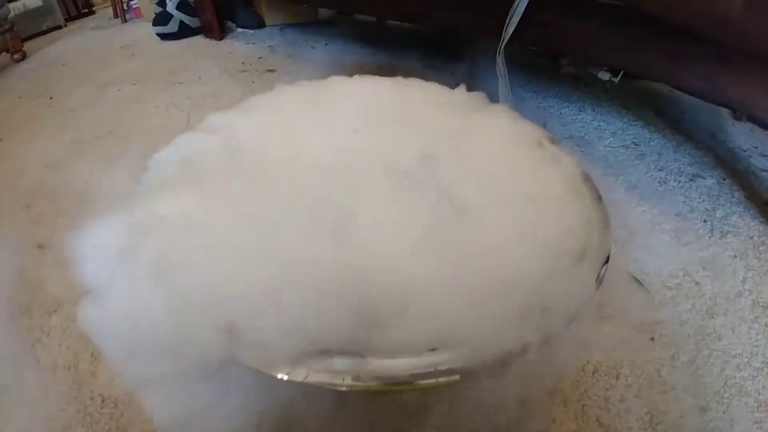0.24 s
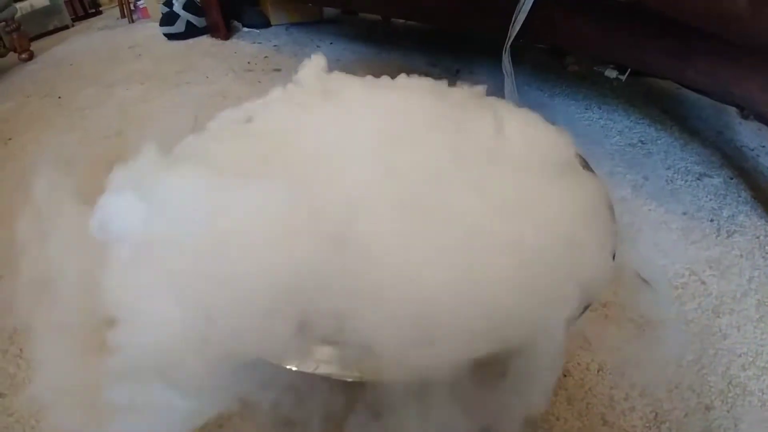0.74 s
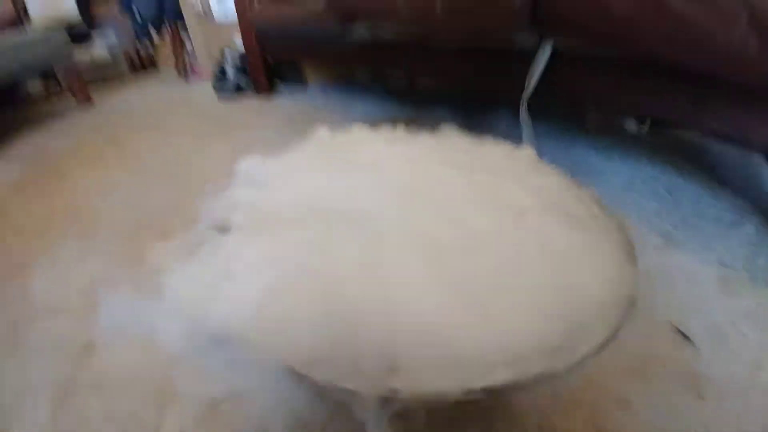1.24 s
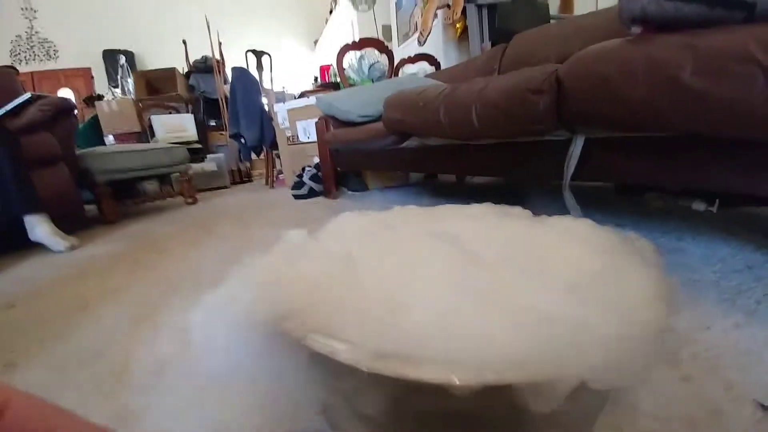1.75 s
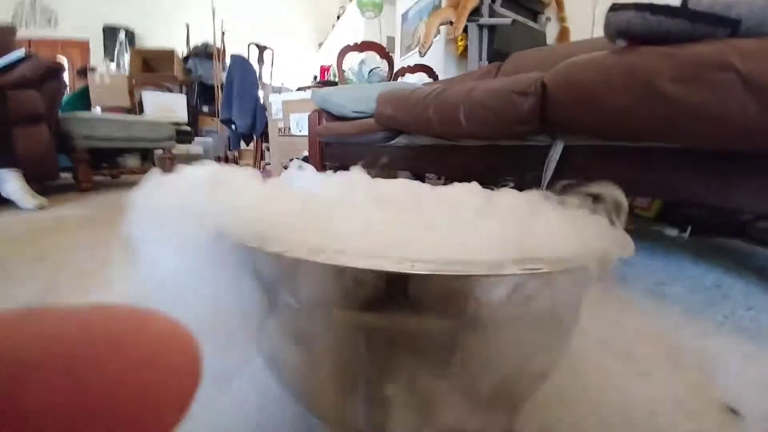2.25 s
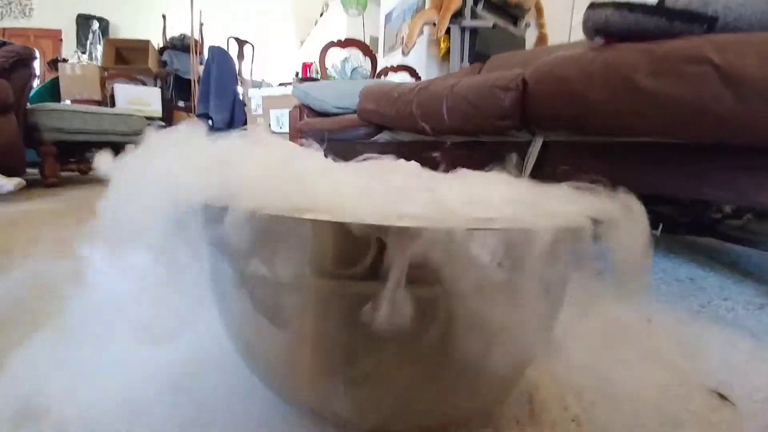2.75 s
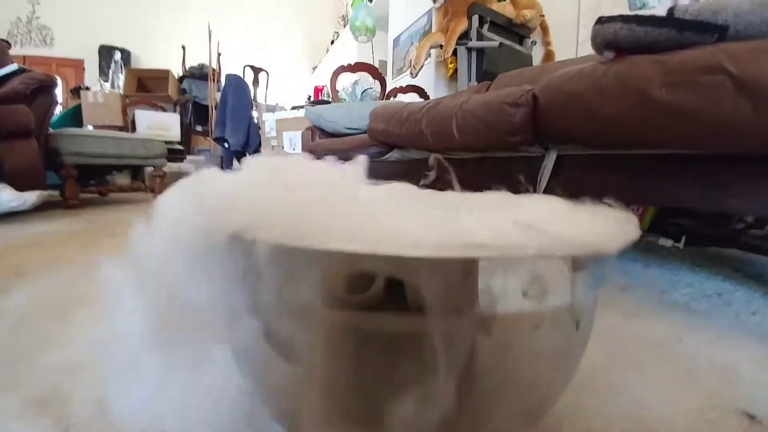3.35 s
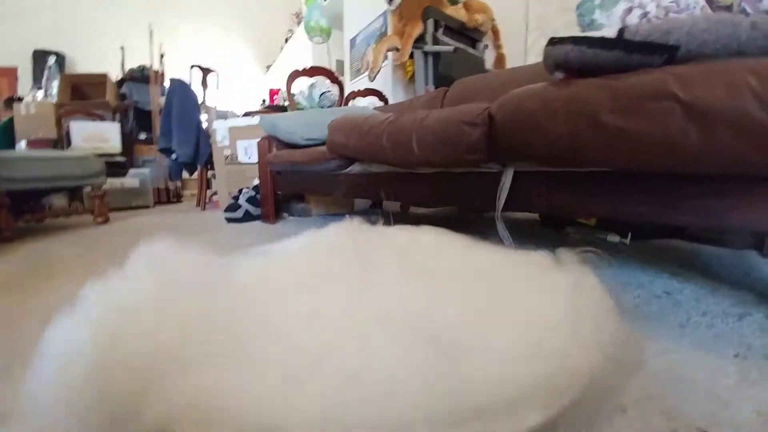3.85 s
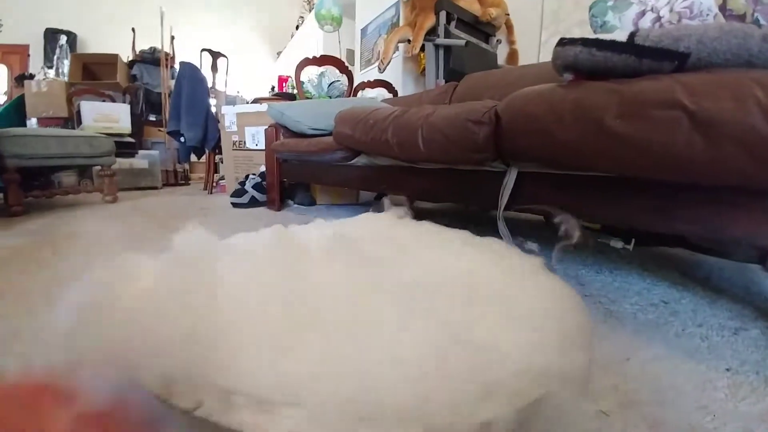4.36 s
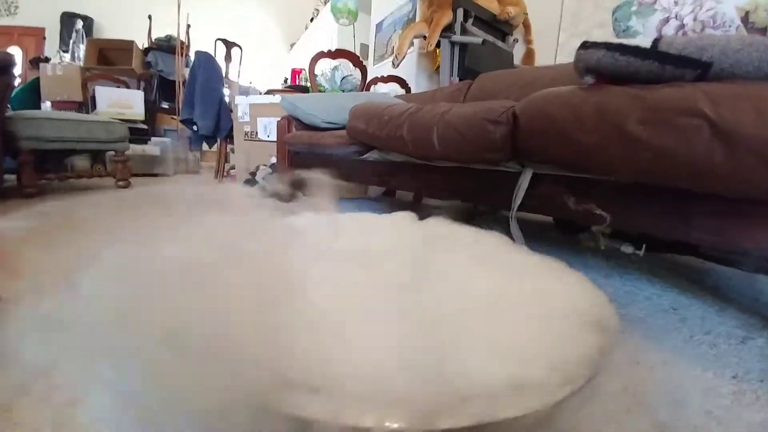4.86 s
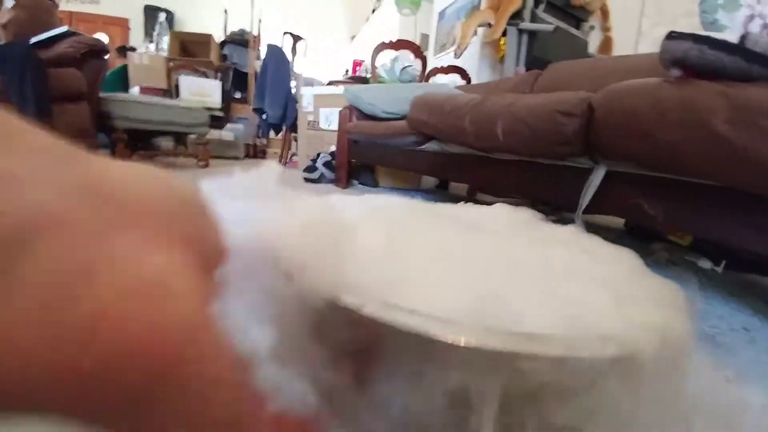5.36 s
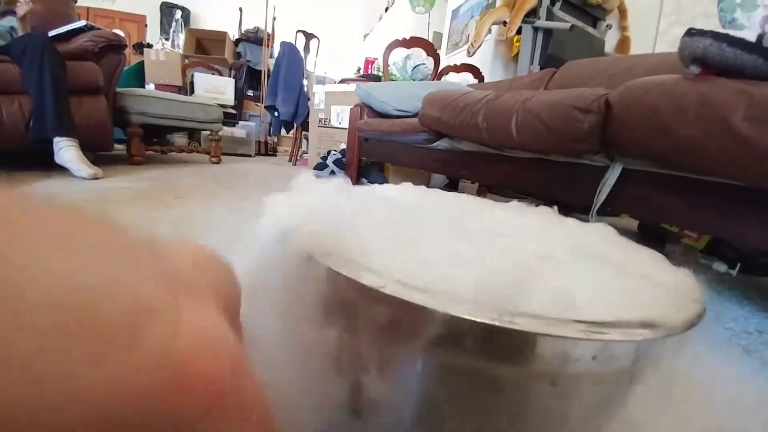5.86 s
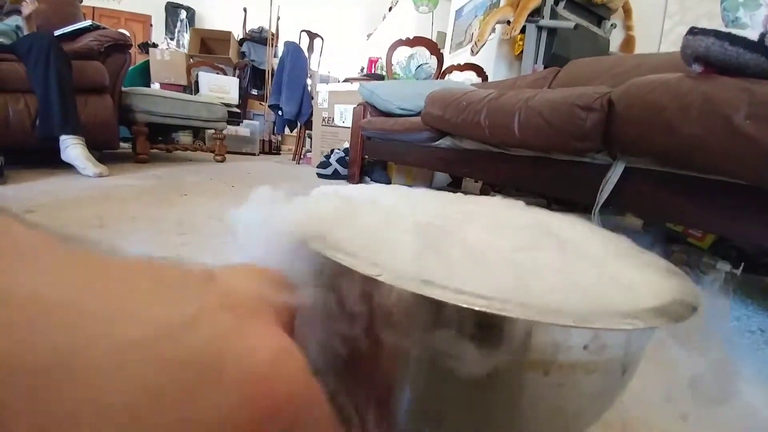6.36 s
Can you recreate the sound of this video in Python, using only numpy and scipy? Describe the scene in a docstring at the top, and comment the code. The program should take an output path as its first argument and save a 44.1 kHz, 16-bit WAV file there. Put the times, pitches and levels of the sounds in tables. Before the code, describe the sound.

Dry ice boils noisily in a steel bowl, hollow gurgles and blips tumbling over one another amid light crackling spray and low hum.

```python
"""Dry ice boils in a steel bowl of water on a living-room carpet, heard from close by over appliance hum and air.
It opens on the loudest glug: a sine swells as its pitch glides up through the bowl's resonances. More follow
to the end, over a churn of small ringing bubbles, a hissing, crackling spray and faint chirps.
From 0.18 s falling drops plink, as a ringing bubble with a volley of droplet ticks.
From 0.37 s the sharpest films snap, as noise cracks with a short ring, among fainter snaps at random times."""
import sys
import numpy as np
from scipy import signal
from scipy.fft import rfft, irfft, next_fast_len
from scipy.io import wavfile
from scipy.ndimage import uniform_filter1d

SR = 44100
rng = np.random.default_rng(int(sys.argv[2]) if len(sys.argv) > 2 else 0)


def digitize_waveform(pressure):
    """Quantize a signal to 16-bit integers and store it at the path in sys.argv[1].

    Rows of a 2-D input are taken as channels; values are limited to [-1, 1].
    """
    field = np.atleast_2d(pressure).T
    bounded = np.clip(field, -1, 1)
    quanta = np.round(bounded * 32767).astype(np.int16)
    wavfile.write(sys.argv[1], SR, quanta)


N = 291677
TIME = np.arange(N) / SR

# appliance hum, one motor tone a row, before drift and waver: f/Hz, level/dB
HUM = [(58.6, -43), (67.1, -51), (84, -57.5), (109.2, -46), (120, -51), (176, -55.5), (219.7, -54)]
# spectral shape of the moving air in the room: f/Hz, relative level/dB
AIR = [(20, -31), (45, -11), (60, 5.5), (115, 1.5), (200, 2.5), (320, -4.5), (700, -1), (2000, -37),
       (8000, -48), (16000, -86)]
# loudest big bubbles, before the bowl's colour and the layer's trim:
# t/s (top of the swell), f/Hz, peak level/dB, swell/s, climb/(octaves/s)
GLUGS = [(0.005, 570, -1.4, 0.0095, 17), (0.024, 800, -16.0, 0.008, 15), (0.116, 560, -11.5, 0.008, 12),
         (0.135, 560, -12.0, 0.006, 12), (0.167, 680, -15.0, 0.004, 55), (0.184, 500, -14.0, 0.012, 13),
         (0.23, 560, -17.0, 0.014, 33), (0.271, 520, -18.5, 0.008, 8), (0.295, 570, -13.0, 0.005, 11),
         (0.295, 1340, -6.5, 0.002, 15), (0.375, 520, -12.0, 0.012, 12), (0.398, 710, -5.5, 0.002, 27),
         (0.421, 1330, -7.5, 0.002, 55), (0.46, 620, -16.5, 0.006, 15), (0.494, 550, -17.5, 0.008, 50),
         (0.512, 570, -14.0, 0.006, 37), (0.6, 510, -12.5, 0.006, 0), (0.633, 510, -15.0, 0.014, 15),
         (0.651, 550, -14.5, 0.006, 0), (0.672, 1080, -13.0, 0.009, 18), (0.676, 650, -10.0, 0.003, 60),
         (0.685, 600, -7.0, 0.0025, 36), (0.692, 500, -9.5, 0.01, 18), (0.731, 550, -11.5, 0.005, 12),
         (0.831, 560, -18.5, 0.007, 29), (0.899, 560, -12.5, 0.01, 16), (0.913, 790, -17.0, 0.016, 27),
         (0.935, 1250, -14.0, 0.005, 15), (0.949, 500, -16.5, 0.011, 16), (1.041, 550, -6.0, 0.007, 18),
         (1.186, 520, -11.5, 0.011, 21), (1.295, 1200, -16.0, 0.006, 25), (1.328, 640, -20.5, 0.02, 24),
         (1.357, 860, -18.5, 0.015, 34), (1.431, 540, -16.5, 0.009, 19), (1.517, 570, -16.5, 0.003, 4),
         (1.604, 580, -13.0, 0.004, 33), (1.642, 590, -14.0, 0.009, 20), (1.717, 520, -15.5, 0.012, 15),
         (1.742, 900, -19.0, 0.02, 26), (1.812, 540, -16.5, 0.011, 19), (1.921, 610, -15.0, 0.009, 6),
         (1.957, 590, -10.0, 0.003, 20), (2.093, 640, -14.5, 0.007, 15), (2.132, 570, -16.5, 0.007, 25),
         (2.186, 590, -18.0, 0.02, 28), (2.204, 800, -8.5, 0.002, 12), (2.247, 620, -12.5, 0.007, 26),
         (2.279, 860, -9.5, 0.002, 0), (2.322, 680, -19.0, 0.02, 36), (2.577, 550, -20.5, 0.02, 15),
         (2.619, 870, -11.5, 0.002, 60), (2.838, 840, -15.5, 0.004, 2), (2.846, 410, -12.0, 0.008, 22),
         (2.856, 570, -16.5, 0.009, 13), (2.979, 900, -12.0, 0.003, 45), (3.013, 490, -16.5, 0.009, 14),
         (3.073, 1180, -15.0, 0.004, 30), (3.076, 540, -12.5, 0.005, 10), (3.133, 420, -14.0, 0.008, 20),
         (3.154, 590, -15.5, 0.017, 14), (3.376, 1280, -11.5, 0.005, 35), (3.415, 810, -15.5, 0.007, 2),
         (3.463, 570, -17.5, 0.01, 30), (3.464, 1180, -16.0, 0.004, 30), (3.514, 560, -18.0, 0.007, 3),
         (3.52, 940, -20.0, 0.02, 13), (3.645, 580, -16.5, 0.005, 3), (3.818, 850, -14.5, 0.003, 5),
         (3.831, 590, -11.5, 0.004, 29), (3.969, 540, -18.0, 0.005, 17), (3.99, 840, -11.5, 0.013, 23),
         (4.008, 1160, -15.0, 0.009, 45), (4.082, 510, -16.0, 0.008, 27), (4.23, 560, -18.0, 0.01, 23),
         (4.268, 870, -14.5, 0.006, 12), (4.295, 690, -19.5, 0.02, 24), (4.412, 580, -3.5, 0.003, 2),
         (4.421, 840, -11.0, 0.003, 45), (4.556, 570, -15.5, 0.005, 0), (4.601, 620, -17.0, 0.009, 39),
         (4.67, 540, -18.5, 0.006, 13), (4.927, 560, -10.5, 0.006, 23), (5.007, 530, -20.0, 0.012, 11),
         (5.038, 600, -16.5, 0.02, 27), (5.067, 1250, -12.5, 0.006, 25), (5.288, 840, -9.0, 0.004, 47),
         (5.336, 550, -12.5, 0.006, 2), (5.484, 570, -7.0, 0.008, 25), (5.503, 780, -13.5, 0.007, 18),
         (5.533, 570, -17.0, 0.007, 3), (5.699, 830, -10.5, 0.002, 0), (5.766, 620, -11.5, 0.003, 0),
         (5.949, 520, -11.5, 0.008, 27), (5.964, 510, -16.0, 0.009, 12), (6.009, 1130, -16.0, 0.006, 30),
         (6.142, 860, -6.5, 0.002, 31), (6.198, 570, -16.5, 0.016, 12), (6.235, 510, -16.0, 0.008, 17),
         (6.323, 600, -11.0, 0.004, 30), (6.378, 860, -12.5, 0.005, 23), (6.382, 500, -18.0, 0.009, 16),
         (6.44, 1020, -13.0, 0.008, 52), (6.552, 600, -11.5, 0.005, 16)]
# how the bowl and its water radiate a bubble's tone: f/Hz, level/dB
BOWL = [(250, -16), (370, -11.5), (470, -5), (570, 0), (700, -7), (850, -5), (1050, -12), (1350, -20),
        (1900, -35), (3000, -60)]
# vigour of the boil, before each layer's trim: t/s, level/dB
BOIL = [(0.05, -29), (0.51, -31), (1.31, -27.5), (1.56, -32), (2.0, -27.5), (2.72, -28.5), (3.4, -29.5),
        (3.75, -29), (4.59, -28), (5.8, -27.5), (6.03, -33.5), (6.2, -29.5), (6.6, -28.5)]
# colour of the crowd of small bubbles in the bowl: f/Hz, relative level/dB
CHURN = [(150, -41), (260, -11.5), (350, -18), (430, -8), (580, 3.5), (690, -3.5), (850, -2), (1100, -15.5),
         (1400, -27), (1900, -48), (3000, -40)]
# the bowl shifts from side to side as the microphones move: t/s, left minus right/dB
BEARING = [(0.05, 2.0), (1.98, -0.5), (2.13, -0.5), (3.44, -1), (4.17, 2.5), (5.91, -2), (6.6, -2)]
# strength of the spray, before each layer's trim: t/s, level/dB
SPRAY = [(0.05, -52), (0.8, -50.5), (3.04, -54.5), (3.48, -52), (4.05, -52.5), (4.74, -51.5), (5.76, -52),
         (6.29, -53), (6.6, -52)]
# treble colour of each microphone port: f/Hz, left level/dB, right level/dB
PORTS = [(900, 8, 11.5), (2180, 4, 1.5), (6170, -4.5, -2), (7800, -4, 1), (9050, -13, -15.5),
         (10160, 0.5, -12.5), (12150, -6, -15), (15700, -16, -19.5)]
# loudest thrown drops that fall back and ring: t/s, f/Hz, length/s, level/dB, left minus right/dB
PLINKS = [(0.177, 2800, 0.026, -47.5, 3), (0.319, 2950, 0.011, -44, -1), (0.334, 2430, 0.006, -40.5, -1),
          (1.526, 4250, 0.027, -50.5, -7), (1.756, 3960, 0.025, -50.5, -2),
          (2.229, 2000, 0.00594, -46.5, 0), (2.625, 2950, 0.041, -53, -2), (2.68, 10700, 0.0085, -45.5, 16),
          (3.101, 2770, 0.048, -50, -1), (3.358, 7000, 0.051, -56.5, -22), (3.428, 5330, 0.024, -49.5, -6),
          (4.448, 4870, 0.029, -52.5, 2), (4.54, 3080, 0.057, -55, -5), (4.885, 3020, 0.05, -53.5, -3),
          (5.255, 3360, 0.047, -48.5, -2), (5.303, 1360, 0.0082, -33, 0), (5.814, 3450, 0.021, -47.5, 0),
          (6.076, 1650, 0.031, -42.5, -2)]
# sharpest pops at the surface, before the ports' colour and the layer's trim:
# t/s, peak level/dB, f/Hz, left minus right/dB
POPS = [(0.3724, -21, 4730, 15), (2.6795, -22, 10500, 12), (3.2817, -6, 6860, -26), (3.663, -28, 10500, 13),
        (3.681, -25, 10800, 11), (4.649, -23.5, 10300, 15), (4.7298, -21, 5550, 13),
        (4.9525, -13.5, 11200, 24), (4.963, -34, 13500, 12), (4.9902, -17.5, 7600, -4),
        (5.7455, -20.5, 3670, 4), (6.1776, -28, 8100, -10), (6.349, -22, 7800, -2)]

TAPER = 1.24  # nepers by which a big bubble's tone falls off per swell time, far from its top
SWELL_SKEW = 0.41  # the rise is shorter and the fall longer by this share
# the climb quickens e-fold in GLIDE_BEND swell times; the bubble dies about CLIMB_OCTAVES higher
GLIDE_BEND, CLIMB_OCTAVES = 4., .95
SLOSH = .12  # largest share by which the rocking water detunes the bowl
# share by which a big bubble of average strength stirs up the small ones, and how long after it they follow
STIR, STIR_DELAY_S = .2, .03
SPRAY_SWING, SPRAY_PAN_DB = 1.6, -2.5  # the spray swings further with the bearing, about its own centre
PORT_SPACING_S = 0.00041  # travel time of sound from one port to the other
ROOM_T60_S, ROOM_TREBLE_T60_S = 0.31, 0.15
TOP_HZ = 15800


def undb(db):
    """Decibels to gain."""
    return 10 ** (np.asarray(db) / 20)


def unit(x):
    """The same sound at rms 1."""
    return x / np.sqrt(np.mean(x ** 2))


def curve(table, axis):
    """One column of a control table at every sample."""
    rows = np.array(table)
    return np.interp(TIME, rows[:, 0], rows[:, axis])


def sides(pan_db):
    """Left and right gains for a level difference."""
    return undb(np.array([[.5], [-.5]]) * pan_db)


def spread(sound, pan_db, lag_s):
    """Place a sound by a level difference and a lag between the ports; positive means left louder, left sooner."""
    lag = min(int(abs(lag_s) * SR), 40)
    pair = np.zeros((2, len(sound) + lag))
    first = int(lag_s < 0)
    pair[first, :len(sound)] = sound
    pair[1 - first, lag:] = sound
    return pair * sides(pan_db)


def gain_at(hz, points_hz, points_db):
    """Gain of a spectrum drawn on a log-frequency axis."""
    return undb(np.interp(np.log(hz + 1e-9), np.log(points_hz), points_db))


def colour(x, points_hz, points_db):
    """Filter by a drawn spectrum."""
    size = next_fast_len(N + SR // 10)
    gain = gain_at(np.fft.rfftfreq(size, 1 / SR), points_hz, points_db)
    return irfft(rfft(x, size) * gain, size)[..., :N]


def walk(rate):
    """Smooth random wandering at rms 1, with `rate` fresh values a second."""
    hold = int(SR / rate)
    steps = np.repeat(rng.standard_normal(N // hold + 1), hold)
    return unit(uniform_filter1d(steps, hold)[:N])


def add(out, s, sound):
    """Mix a sound in from a given time."""
    start = int(s * SR)
    lo, hi = max(start, 0), min(start + sound.shape[-1], N)
    if hi > lo:
        out[..., lo:hi] += sound[..., lo - start:hi - start]


def ping(hz, cycles, glide=0., rise=0.45):
    """A bubble starts to ring over about `rise` cycles and dies e-fold per `cycles` while its pitch climbs."""
    age = np.arange(int(5 * cycles * SR / hz) + 2) * hz / SR  # in cycles
    tone = np.sin(2 * np.pi * age * (1 + glide * age / cycles / 2))
    return tone * np.exp(-age / cycles) * (1 - np.exp(-age / rise))


def background(air_db=-38.0, side_db=-13.5, waver_db=2.55, drift_hz=0.36):
    """Wavering, drifting motor tones and moving air, almost alike at both ports."""
    hum = np.zeros(N)
    for hz, db in HUM:
        level = undb(db + waver_db * walk(4)) * np.sqrt(2)
        phase = 2 * np.pi * np.cumsum(hz + drift_hz * walk(5.05)) / SR
        hum += level * np.sin(phase)
    mid, side = unit(colour(rng.standard_normal((2, N)), *np.transpose(AIR)))
    return hum + undb(air_db) * (mid + undb(side_db) * side * np.array([[1], [-1]]))


def glugs(rows, level_db, spread_db=0.0, lag_s=0.00022, slosh=0.):
    """Bubbles swell as they pinch off the ice and climb through the bowl's resonances, faster near the surface.
    Each meets those resonances shifted at random by up to the share `slosh`."""
    out = np.zeros((2, N))
    for (s, hz, db, swell, glide), (turn, place) in zip(rows, rng.random((len(rows), 2))):
        t = np.arange(-3 * swell, 6 * swell, 1 / SR)
        bend = GLIDE_BEND * swell
        climb = np.minimum(glide * bend * np.expm1(t / bend), 2 * CLIMB_OCTAVES)
        pitch = hz * 2 ** climb
        afloat = np.exp(-(climb / CLIMB_OCTAVES) ** 4)  # dies at the surface
        width = swell * (1 + min(SWELL_SKEW, .8) * np.sign(t))
        resonance = gain_at(pitch * (1 + slosh * (2 * turn - 1)), *np.transpose(BOWL))
        fade_in = np.minimum((t - t[0]) / swell, 1)
        envelope = resonance / np.cosh(TAPER * t / width) * fade_in
        tone = np.sin(2 * np.pi * (np.cumsum(pitch) / SR + turn))
        across = 2 * place - 1
        glug = undb(db + level_db) * envelope * afloat * tone
        add(out, s + t[0], spread(glug, spread_db * across, lag_s * across))
    return out


def lesser_glugs(count=140, low_hz=479.8, high_hz=1100.3, swell_s=.0065, swell_spread=0.4,
                 scatter_db=7.0, glide=22.03):
    """Weaker bubbles of all sizes keep leaving the ice, as strongly as it boils: rows with the columns of GLUGS."""
    when, size, haste = rng.random((count, 3)).T
    loud, slow = rng.standard_normal((count, 2)).clip(-2, 2).T
    times = (np.arange(count) + when) / count * N / SR
    pitches = low_hz * (high_hz / low_hz) ** size
    db = np.interp(times, *np.transpose(BOIL)) + scatter_db * np.minimum(loud, 1)
    swells = swell_s * np.exp(swell_spread * slow)
    return np.column_stack([times, pitches, db, swells, glide * (.5 + haste)])


def churn(big, count=2600, cycles=4.175, glide=0.159, scatter_db=4.0, spread_db=-0.5,
          lag_s=0.00011, level_db=0.1):
    """A crowd of small bubbles rings, each from its own place in the bowl; a passing big bubble stirs them up."""
    out = np.zeros((2, N))
    chance = zip(rng.random((count, 2)), rng.standard_normal((count, 3)).clip(-2, 2))
    for k, ((when, height), (loud, ring, place)) in enumerate(chance):
        bubble = ping(220 + 1300 * height, cycles * np.exp(.3 * ring), glide)
        bubble = bubble / np.linalg.norm(bubble) * undb(scatter_db * min(loud, 1))
        add(out, (k + when) / count * N / SR, spread(bubble, spread_db * place, lag_s * place))
    wake = uniform_filter1d(np.abs(big[0]), SR // 40)
    late_wake = np.pad(wake, (int(STIR_DELAY_S * SR), 0))[:N]
    stirred = 1 + STIR * np.minimum(late_wake / wake.mean(), 3)
    crowd = unit(colour(out, *np.transpose(CHURN)) * stirred)
    return crowd * undb(curve(BOIL, axis=1) + level_db)


def ports(x):
    """Each microphone port colours the treble in its own way."""
    hz, left_db, right_db = np.transpose(PORTS)
    return np.array([colour(x[0], hz, left_db), colour(x[1], hz, right_db)])


def fizz(count=8000, scatter_db=5.0, spread_db=10.5, crackle_db=-2.0, mist_db=-2.5,
         flurry_db=4.5, swell_db=0.93, level_db=3.0):
    """Tiny films burst in flurries: a crackle over a fine hiss, coloured by each port."""
    out = np.zeros((2, N))
    strengths = np.minimum(rng.exponential(size=count), 3.8)
    for (when, pitch, place), strength in zip(rng.random((count, 3)), strengths):
        grain = ping(1500 + 14000 * pitch, 2.5)
        # the higher the grain, the more its loudness varies
        grain = grain / np.linalg.norm(grain) * undb(scatter_db * strength * np.sqrt(.3 + pitch))
        pan_db, lag_s = spread_db * (2 * place - 1), PORT_SPACING_S * (2 * place - .5)
        add(out, when * N / SR, spread(grain, pan_db, lag_s))
    crackle = unit(out * undb(flurry_db * walk(40)))
    mist = colour(rng.standard_normal((2, N)), [5000, 14000], [0, -4])
    spray = unit(ports(undb(crackle_db) * crackle + undb(mist_db) * mist))
    level = undb(curve(SPRAY, axis=1) + level_db + swell_db * walk(13))
    return spray * level * sides(SPRAY_PAN_DB + SPRAY_SWING * curve(BEARING, axis=1))


def chirps(count=280, low_hz=1245.0, high_hz=3900.0, cycles=7.3, glide=0.082, scatter_db=2.0, level_db=-41.0):
    """Little bubbles chirp just under the surface, the smallest and highest most faintly."""
    out = np.zeros((2, N))
    chance = zip(rng.random((count, 2)), rng.standard_normal((count, 2)).clip(-2, 2))
    for (when, height), (loud, place) in chance:
        hz = low_hz * (high_hz / low_hz) ** height
        chirp = ping(hz, cycles, glide) * undb(level_db + scatter_db * loud) * low_hz / hz
        add(out, when * N / SR, spread(chirp, 3 * place, PORT_SPACING_S * place / 2))
    return out


def plinks(rows, count=16, pitch_spread=0.039, ring_s=0.0025, least_cycles=5.1, droplet_ring=.45, glide=0.012):
    """A drop traps one ringing bubble; its droplets spatter after it in brief ticks of like pitch."""
    out = np.zeros((2, N))
    for s, hz, length, db, pan_db in rows:
        volley = np.zeros((2, SR // 5))
        room_left = volley.shape[1]
        cycles = least_cycles + hz * ring_s
        lead = ping(hz, cycles, glide, rise=cycles / 2)[:room_left]
        volley[:, :len(lead)] = lead
        for when, (pitch, *loud) in zip(rng.random(count), rng.standard_normal((count, 3))):
            start = int(when * length * SR)
            tick = ping(hz * np.exp(pitch_spread * pitch), cycles * droplet_ring, glide)[:room_left - start]
            # each side draws its own loudness; later ticks are fainter
            volley[:, start:start + len(tick)] += undb(3 * np.array(loud) - 6 * when)[:, None] * tick
        volley *= np.sqrt(2 * length * SR / np.sum(volley ** 2))  # rms 1 over the length
        add(out, s, volley * undb(db) * sides(pan_db))
    return out


def pops(rows, ring_s=0.0004, snap=1.3, level_db=-1.5):
    """A taut film snaps: a bright crack of noise with a short ring."""
    out, t = np.zeros((2, N)), np.arange(SR // 200) / SR
    bright = signal.butter(7, 3300, "high", fs=SR, output="sos")
    for s, db, hz, pan_db in rows:
        burst = np.sin(2 * np.pi * hz * t) + snap * rng.standard_normal(len(t))
        pop = signal.sosfilt(bright, burst * t * np.exp(-2 * t / ring_s))
        pan = sides(pan_db) / sides(pan_db).mean()
        add(out, s, pop / np.abs(pop).max() * undb(db + level_db) * pan)
    return out


def faint_pops(count=260, low_hz=4340.0, high_hz=12600.0, scatter_db=4.0, over_spray_db=13.0, spread_db=19.0):
    """Weaker films snap at random, as strongly as the spray flies: rows with the columns of POPS."""
    when, height = rng.random((count, 2)).T
    times = when * N / SR
    extra_db = over_spray_db + scatter_db * np.minimum(rng.exponential(size=count), 3)
    db = np.interp(times, *np.transpose(SPRAY)) + extra_db
    pitches = low_hz * (high_hz / low_hz) ** height
    return np.column_stack([times, db, pitches, spread_db * rng.standard_normal(count)])


def room(x, early_db, late_db, early_s):
    """Carpet, sofa and bowl rim send quick reflections; the furnished room adds a short tail."""
    t = np.arange(SR // 2) / SR
    early, low, high = rng.standard_normal((3, 2, len(t))) * (t > .0015)
    soft = signal.butter(1, 2000, fs=SR, output="sos")
    late = signal.sosfilt(soft, low) * undb(-60 * t / ROOM_T60_S)
    late += (high - signal.sosfilt(soft, high)) * undb(-60 * t / ROOM_TREBLE_T60_S)
    early = early * np.exp(-t / early_s)
    early = undb(early_db) * early / np.linalg.norm(early, axis=1, keepdims=True)
    late = undb(late_db) * late / np.linalg.norm(late, axis=1, keepdims=True)
    mid, side = rfft(early + late)
    # long waves reach both ports alike, short ones do not
    alike = np.sinc(2 * np.fft.rfftfreq(len(t), 1 / SR) * PORT_SPACING_S)
    mid, side = mid * np.sqrt((1 + alike) / 2), side * np.sqrt((1 - alike) / 2)
    response = irfft(mid + side * np.array([[1], [-1]]), len(t))
    return x + signal.fftconvolve(x, response[:, :-SR // 10], axes=1)[:, :N]


def scene():
    """Bubbles, spray and drops in the room, over its hum; the big bubbles are close and nearly dry."""
    hum_and_air = background()
    big = room(glugs(GLUGS, level_db=0.6), early_db=-25., late_db=-23., early_s=0.0042)
    lesser = glugs(lesser_glugs(), level_db=2.5, spread_db=-1.0, lag_s=0.00037, slosh=SLOSH)
    small = room(churn(big) + lesser, early_db=-8.5, late_db=-13.0, early_s=0.0033)
    spray = room(fizz() + chirps() + plinks(PLINKS), early_db=-4.0, late_db=-6.0, early_s=0.0019)
    snaps = room(ports(pops(POPS) + pops(faint_pops())), early_db=-16., late_db=-13., early_s=.004)
    return hum_and_air + (big + small) * sides(curve(BEARING, axis=1)) + spray + snaps


def record(dry):
    """A steep low-pass cuts the top treble."""
    return signal.sosfilt(signal.ellip(8, .2, 70, TOP_HZ, fs=SR, output="sos"), dry)


dry = scene()
out = record(dry)
digitize_waveform(out)
```